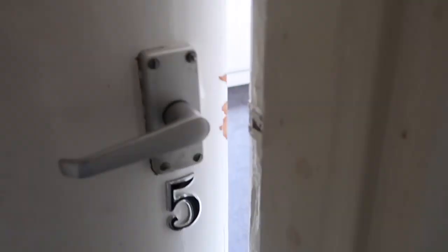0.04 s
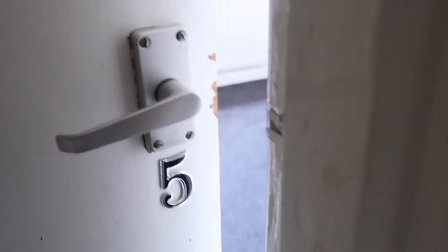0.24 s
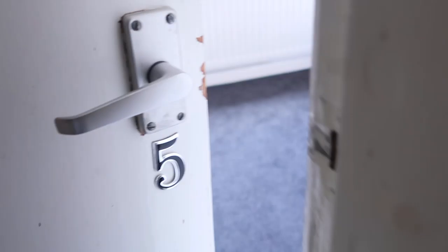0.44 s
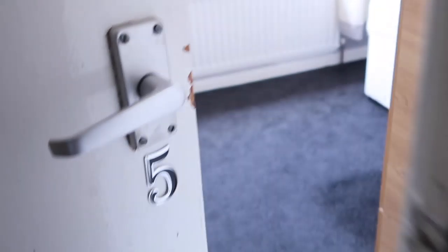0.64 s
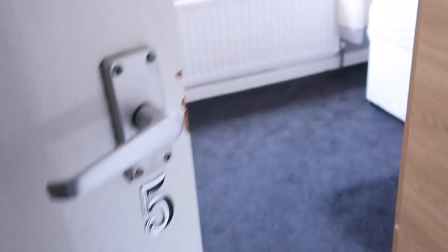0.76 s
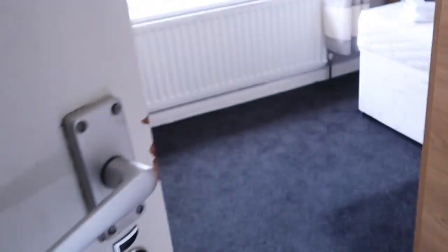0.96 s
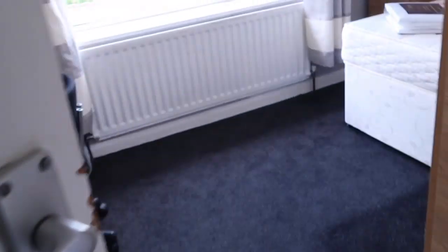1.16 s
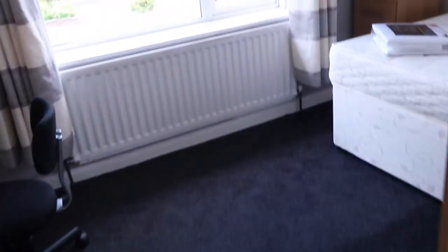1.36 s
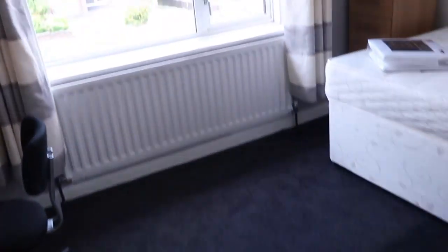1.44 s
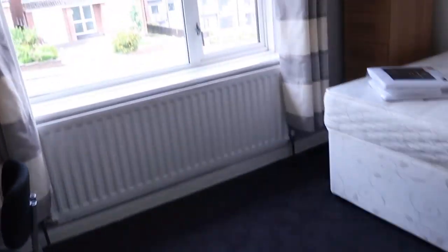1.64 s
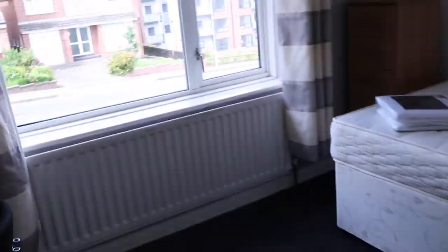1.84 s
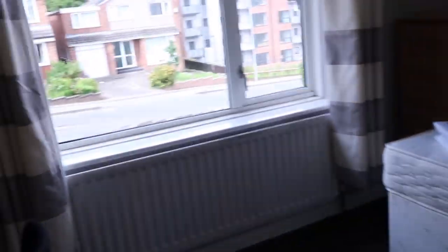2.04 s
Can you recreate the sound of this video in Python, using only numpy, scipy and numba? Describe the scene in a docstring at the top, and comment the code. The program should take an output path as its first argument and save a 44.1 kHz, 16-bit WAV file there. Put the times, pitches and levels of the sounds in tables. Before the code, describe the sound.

A door hinge squeals in a small, fairly dry carpeted room, heard close. Quiet room tone and soft low puffs of air on the microphones come first, strongest around 0.5 s. At 0.74 s a nasal squeal starts, steps up near 0.9 s, wavers, then slides down raspily until 1.28 s. A sharp wooden crack hits at 1.45 s, a small tick at 1.66 s, and a rough creaking groan runs from 1.83 to 2.1 s.

```python
"""Squealing door hinge

A door swings open near a hand-held camera in a carpeted room. Its hinge sticks and slips: summed harmonics
squeal, jump up a step and slide down into a rasp of fluttering harmonics and random clicks through resonators.
A lone crack and a later rough groan are random clicks ringing resonances; short noise bursts in single bands
give the squeal's onset, a faint high whistle and small ticks. Soft puffs of air on the microphones are low
swelling sines; filtered noise lies under everything as a quiet room tone."""
import sys
import numpy as np
from scipy import signal
from scipy.fft import rfft, irfft
from scipy.io import wavfile
from scipy.ndimage import uniform_filter1d
from numba import njit

SR = 44100
rng = np.random.default_rng(int(sys.argv[2]) if len(sys.argv) > 2 else 0)


def how_loud(loudness_db):
    """Turn decibels into a plain amplitude multiplier (0 dB gives 1, 20 dB gives 10)."""
    steps = np.asarray(loudness_db, float) / 20
    return 10 ** steps


def store_wav(level_fs):
    """Save 16-bit WAV to argv[1]."""
    pcm = np.round(np.clip(np.atleast_2d(level_fs), -1, 1) * 32767)
    wavfile.write(sys.argv[1], SR, pcm.T.astype(np.int16))


N = 92962
t = np.arange(N) / SR


def unit(x):
    """Normalisation: scale a signal to rms 1."""
    return x / np.sqrt(np.mean(x ** 2))


def along(rows, column=1):
    """Linear interpolation: one column of a time table at every sample, its ends held."""
    rows = np.array(rows, float)
    return np.interp(t, rows[:, 0], rows[:, column])


def tint_db(table, hz):
    """Spectral envelope: level of a (hz, level_db) table, interpolated on a log frequency axis."""
    table = np.array(table, float)
    return np.interp(np.log(np.maximum(hz, 1)), np.log(table[:, 0]), table[:, 1])


def colour(x, table):
    """Linear filtering: multiply the spectrum by a (hz, level_db) envelope."""
    hz = np.arange(N // 2 + 1) * SR / N
    return irfft(rfft(x) * how_loud(tint_db(table, hz)), N)


def late(x, lag_s):
    """Propagation delay: a phase shift proportional to frequency."""
    hz = np.arange(N // 2 + 1) * SR / N
    return irfft(rfft(x) * np.exp(-2j * np.pi * hz * lag_s), N)


def ring(x, hz, width_hz):
    """Simple resonance: one damped mode driven by x."""
    return signal.lfilter(*signal.iirpeak(hz, hz / width_hz, SR), x)


def walk(rate_hz):
    """Slow random modulation: white noise averaged twice over 1 / rate_hz, rms 1."""
    length = int(SR / rate_hz)
    return unit(uniform_filter1d(uniform_filter1d(rng.standard_normal(N), length), length))


def slips(rate_hz, spread_db):
    """Random impulse train: clicks of chance timing, size and sign, rate_hz on average, rms 1."""
    chance = rng.random((2, N))
    size = how_loud(spread_db * rng.standard_normal(N))
    return unit((chance[0] < rate_hz / SR) * size * np.sign(chance[1] - 0.5))


def gate(rows, fade_s=0.0011):
    """Time window: 1 inside a table's time span, with short linear fades."""
    return np.clip(np.minimum(t - rows[0][0], rows[-1][0] - t) / fade_s, 0, 1)


def burst(start_s, level_db, t60_s):
    """Exponential decay: a sudden start, then a fall of 60 dB in t60_s."""
    age = np.maximum(t - start_s, 0)
    return how_loud(level_db - 60 * age / t60_s) * np.clip(age / 0.0015, 0, 1)


def body(x, peaks, patchy_db=0, patchy_hz=50):
    """Modal superposition: parallel resonances, each swaying on its own by patchy_db; rms 1."""
    total = 0
    for k, (hz, width_hz, level_db) in enumerate(peaks):
        mode = unit(ring(ring(x, hz, width_hz), hz, width_hz))  # twice, for steep flanks
        gain = how_loud(level_db + patchy_db * walk(patchy_hz)) * np.sqrt(width_hz)
        total = total + (-1) ** k * gain * mode
    return unit(total)


# spectral density of the room tone's sum (mid) and difference (side) of channels, relative:
# hz [Hz], level_db [dB per Hz]
TONE_MID = [(15, -59.5), (30, -23.5), (110, 0.5), (250, 3), (500, -4.5), (1000, -8), (2000, -13.5),
            (4000, -19), (6000, -25), (11000, -38), (14000, -44.5)]
TONE_SIDE = [(15, -77), (30, -28.5), (340, 0.5), (570, -9), (1300, -13), (2100, -18), (4000, -20.5),
             (6000, -27.5), (9000, -35.5), (14000, -46.5)]
# course of the mid rms, before the flicker: start_s [s], level_db [dB]
TONE_LEVEL = [(0, -62.5), (.15, -64.5), (.3, -67.5), (.38, -72), (.7, -68.5), (1.35, -61.5), (1.6, -68),
              (2.11, -59.5)]


def room_tone():
    """Diffuse noise: coloured, partly decorrelated between the channels, flickering a little in level."""
    side_db = -2.5  # relative to mid
    mid = unit(colour(rng.standard_normal(N), TONE_MID)) * how_loud(2 * walk(44))
    side = unit(colour(rng.standard_normal(N), TONE_SIDE)) * how_loud(2 * walk(44))
    return how_loud(along(TONE_LEVEL)) * (mid + how_loud(side_db) * side * np.array([[1], [-1]]))


# soft puffs of air on the microphones, before sway and band filter:
# start_s [s], length_s [s], level_db [dB, nominal peak], pitch_hz [Hz], pan_db [dB, left minus right]
PUFFS = [(0.396, 0.014, -35.5, 131.5, -5), (0.41, .011, -34.5, 134, -1.5), (0.426, 0.022, -57, 110, -5),
         (0.465, 0.024, -53.5, 102, -2), (0.482, 0.012, -40, 95, 8), (0.497, 0.014, -38, 120, -9.5),
         (0.517, 0.016, -25, 121, 7), (0.532, 0.019, -28, 178, 4), (0.528, 0.0099, -35, 322, 2.5),
         (0.547, 0.02, -44.5, 137, 8), (0.576, 0.055, -45.5, 82.6, -2), (0.666, 0.033, -46, 107.5, 6.5),
         (0.698, 0.03, -52.5, 112.6, -3.5), (0.968, 0.019, -47, 133.8, -7), (1.801, 0.014, -45.5, 189, 4),
         (1.817, 0.015, -45, 146, 0)]


def puffs():
    """Amplitude and frequency modulation: short uneven low wobbles, panned singly, earlier on the right."""
    pitch_sway, harmonic_db, left_lag_s = 0.05, -13.5, 0.00086
    out, sway, shake = 0, walk(160), how_loud(1.1 * walk(110))
    for start_s, length_s, level_db, pitch_hz, pan_db in PUFFS:
        phase = 2 * np.pi * np.cumsum(pitch_hz * (1 + pitch_sway * sway) * (t > start_s)) / SR
        swell = np.sin(np.pi * np.clip((t - start_s) / length_s, 0, 1)) ** 0.78
        harmonic = how_loud(harmonic_db) * swell ** 2 * np.cos(2 * phase)
        wobble = -swell * shake * (np.sin(phase) + harmonic)
        out = out + how_loud(level_db + np.array([[pan_db], [-pan_db]]) / 2) * wobble
    out = signal.sosfilt(signal.butter(2, [38, 400], "band", fs=SR, output="sos"), out)
    return np.array([late(out[0], left_lag_s), out[1]])


# the groan's rms in the door's low, middle and high resonances:
# start_s [s], low_db [dB], middle_db [dB], high_db [dB]
GROAN = [(1.828, -51, -69, -91), (1.844, -44.5, -44.5, -99), (1.854, -44, -44.5, -63),
         (1.896, -37.5, -45.5, -55.5), (1.92, -47.5, -46, -67), (1.978, -40.5, -46.5, -66),
         (1.992, -42, -45, -64), (2.028, -51.5, -46, -66.5), (2.1, -47.5, -56.5, -97),
         (2.108, -50, -55.5, -89)]
# the door's resonances, a low, a middle and a high group, each ringing twice in series:
# pitch_hz [Hz], width_hz [Hz, of one pass], level_db [dB, relative density]
DOOR = [
    [(342.6, 107, 3), (500, 120, -11), (784, 198, -2.5), (979, 49, -9.5)],
    [(1336, 640, -10.5), (1850, 410, -8.5), (2114, 93, 0), (2296, 177, 1)],
    [(3000, 350, -4), (3480, 110, 2.5), (3880, 200, 2.5), (4426, 240, 5.5), (4750, 140, -7)],
]


def groan():
    """Forced vibration: dense irregular slips ring the door's resonances."""
    grit = slips(1900, 1)
    out = 0
    for k, peaks in enumerate(DOOR):
        out = out + body(grit, peaks, 2.3, 30) * how_loud(along(GROAN, k + 1))
    return out * (t > GROAN[0][0])


# short noise bursts: the squeal's onset, a faint high whistle, small ticks (one of several bands);
# each band rings twice in series:
# start_s [s], level_db [dB, rms at onset before halving], pitch_hz [Hz], width_hz [Hz, of one pass], t60_s [s]
NOISE_BURSTS = [(0.739, -42, 1350, 587, 0.097), (0.794, -65, 10550, 2000, 0.27),
                (1.031, -40.5, 11200, 2206, .016), (1.638, -52, 350, 245, 0.087),
                (1.6561, -29, 2240, 486, 0.01), (1.6567, -38, 4330, 890, 0.014),
                (1.659, -40.5, 1700, 296, 0.022), (1.697, -52, 350, 250, 0.11)]


def noise_bursts():
    """Band-limited noise: each burst is noise through one resonance, starting suddenly and decaying."""
    out = 0
    for start_s, level_db, pitch_hz, width_hz, t60_s in NOISE_BURSTS:
        band = body(rng.standard_normal(N), [(pitch_hz, width_hz, 0)])
        out = out + burst(start_s, level_db, t60_s) * band / 2
    return out


# the loud crack: start_s [s], level_db [dB, before the wood and the first blow], t60_s [s]
CRACK = (1.448, -31, 0.16)
# the wood's resonances under crack and scrape, each ringing twice in series:
# pitch_hz [Hz], width_hz [Hz, of one pass], level_db [dB, relative density]
WOOD = [(350, 176, -4), (987, 670, -2.5), (1487, 200, 0.5), (1860, 620, -1.5), (2286, 150, -4.5),
        (2660, 220, 4.5), (3115, 350, -16), (3574, 140, -3), (5260, 1800, -27.5), (8260, 1100, -31),
        (11420, 1200, -24), (13200, 1600, -34)]


def crack():
    """Impulsive excitation: a decaying rattle of clicks rings the wood's modes."""
    first_blow = 1 + 1.5 * burst(CRACK[0], 0, 0.03)  # stands out of the rattle
    return first_blow * burst(*CRACK) * body(slips(3100, 2), WOOD) / 2


# the two rasps while the pin slides, before the offsets in scrape() and squeal():
# start_s [s], level_db [dB]
RASP = [
    [(0.86, -59), (0.88, -37), (0.895, -44), (0.925, -45), (0.96, -56.5)],
    [(1.12, -59), (1.134, -49), (1.141, -44), (1.18, -36), (1.21, -38.5), (1.228, -39.5), (1.25, -53),
     (1.3, -84)],
]


def scrape():
    """Sliding friction: uneven slips ring the wood while the pin slides."""
    offset_db = -9
    grit = body(slips(900, 2.4), WOOD[:9], 3, 90)
    return sum(gate(rows, 0.0076) * how_loud(along(rows) + offset_db) for rows in RASP) * grit


def slip_phase(rows):
    """Frequency integration: phase of the stick-slip cycle, its rate shaking by 0.5 % rms."""
    return 2 * np.pi * np.cumsum(along(rows) * (1 + 0.005 * walk(150))) / SR


def overtones(rows, phase, table, sway, numbers):
    """Fourier synthesis: multiples of the slip rate under an envelope, each swaying on its own."""
    gains = [how_loud(tint_db(table, k * along(rows))) for k in numbers]
    total = 0
    for k, gain in zip(numbers, gains):
        total = total + gain * sway() * np.sin(k * phase + 2 * np.pi * rng.random())
    return total / np.sqrt(sum(gain ** 2 for gain in gains))  # rms about 0.7


# squeal at the low, then the high grip of the hinge pin: start_s [s], pitch_hz [Hz, slip rate],
# level_db [dB, fundamental], low_db [dB, low overtones], high_db [dB, high overtones]
SQUEAL_LOW = [(0.736, 723, -61.5, -64.5, -84.5), (0.741, 643.3, -34, -49, -71),
              (0.747, 576.4, -42.5, -42.5, -57), (0.758, 580, -30.5, -43.5, -54.5),
              (0.78, 571, -36, -41, -60), (0.797, 571, -36, -42.5, -70.5), (0.83, 560.3, -33, -48, -62),
              (0.845, 566.2, -28, -44, -48), (0.865, 581.3, -32, -41.5, -37.5),
              (0.877, 606.2, -33, -29, -48.5), (0.887, 600.5, -59, -29, -47),
              (0.893, 602.6, -37.5, -57, -63.5), (0.923, 601, -43, -59.5, -70),
              (0.94, 595, -53, -62.5, -71.5)]
SQUEAL_HIGH = [(0.882, 760, -45.5, -55, -58.5), (0.892, 785.6, -29.5, -48, -45.5),
               (0.922, 784, -39, -57.5, -40), (0.944, 784.8, -53, -43.5, -37.5),
               (0.954, 785.3, -31, -47.5, -48.5), (0.968, 750, -27.5, -39.5, -50.5),
               (0.982, 758.2, -34.5, -51.5, -52), (0.99, 753.8, -33, -38, -51.5),
               (1.014, 771.3, -35, -57, -64), (1.046, 794.3, -44, -68, -58), (1.068, 812, -31, -44, -55),
               (1.086, 824.3, -37.5, -46, -43.5), (1.1, 819.5, -34, -48, -52),
               (1.118, 786.4, -35, -47, -57.5), (1.135, 774, -44, -55, -54),
               (1.142, 730.6, -31.5, -37.5, -51), (1.149, 719, -46.5, -38, -45),
               (1.154, 687, -32, -59, -63), (1.161, 603, -40, -63, -54), (1.166, 576.4, -34, -44.5, -43.5),
               (1.188, 531.6, -40.5, -57.5, -37), (1.212, 473, -59.5, -58.5, -50),
               (1.22, 433.6, -42, -41.5, -64), (1.229, 405, -35.5, -52, -68),
               (1.235, 390.4, -46, -48, -84.5), (1.242, 350.7, -34.5, -43.5, -65.5),
               (1.251, 344.4, -43.5, -54.5, -69), (1.256, 347, -36, -59, -73),
               (1.262, 324, -41, -57.5, -74), (1.273, 309, -51.5, -59, -76), (1.281, 310, -69, -69, -92)]
# relative colour of the clean overtones and of the rasp: hz [Hz], level_db [dB]
HINGE_COLOUR = [(700, 8.5), (1200, 12), (1750, 14.5), (2400, 0.5), (3200, -2), (4200, 0.5), (5200, -18),
                (6500, -36.5), (13000, -53)]
RASP_COLOUR = [(250, 13), (400, 4.5), (1100, 2), (1550, 1.5), (2150, -5), (2650, -3.5), (3100, -6),
               (3550, -4.5), (4300, -8), (6000, -22), (7800, -40.5), (14000, -49)]


def squeal(rows, rasp):
    """Stick-slip oscillation: fundamental, clean overtones, and fluttering ones while the pin slides."""
    split_hz, rasp_offset_db, rasp_jitter = 2000, -4, 0.028
    phase = slip_phase(rows)
    over = overtones(rows, phase, HINGE_COLOUR, lambda: how_loud(5 * walk(70)), range(2, 18))
    low = signal.sosfiltfilt(signal.butter(2, split_hz, "low", fs=SR, output="sos"), over)
    high = signal.sosfiltfilt(signal.butter(2, split_hz, "high", fs=SR, output="sos"), over)
    clean = how_loud(along(rows, 2)) * np.sin(phase)
    clean = clean + how_loud(along(rows, 3)) * low + how_loud(along(rows, 4)) * high
    shaken = phase + 2 * np.pi * np.cumsum(along(rows) * rasp_jitter * walk(120)) / SR
    rough = overtones(rows, shaken, RASP_COLOUR, lambda: walk(220), range(1, 24))
    rough = signal.sosfilt(signal.butter(2, 260, "high", fs=SR, output="sos"), rough)
    rough = gate(rasp, 0.012) * how_loud(along(rasp) + rasp_offset_db) * rough
    return np.sqrt(2) * (gate(rows) * clean + rough)


@njit
def walls(x, lags, gain, damp):
    """Feedback delay network: eight delay lines feed each other, duller on every round."""
    line, soft, out = np.zeros((8, 4096)), np.zeros(8), np.zeros((2, len(x)))
    for i in range(len(x)):
        total = 0.
        for k in range(8):
            soft[k] += (1 - damp) * (gain[k] * line[k, (i - lags[k]) & 4095] - soft[k])
            total += soft[k]
            out[k % 2, i] += soft[k]
        for k in range(8):
            line[k, i & 4095] = x[i] + soft[k] - total / 4  # lossless mixing of the lines
    return out


def reverberate(door):
    """Reverberation: the door off the walls, its channels differing mainly in the treble."""
    t60_s, damp = 0.23, 0.63  # t60 of the lowest tones; higher ones die sooner
    lags = np.array([331, 457, 601, 743, 887, 1049, 1213, 1399])  # samples
    echo = walls(door + 1e-18, lags, how_loud(-60 * lags / SR / t60_s), damp)
    # close microphones hear the bass alike
    side = signal.lfilter(*signal.butter(1, 2500, "high", fs=SR), echo[0] - echo[1]) * how_loud(-1)
    return (echo[0] + echo[1] + side * np.array([[1], [-1]])) / 2


def scene():
    """Superposition: door direct and off the walls, puffs, room tone; direct sound is later on the right."""
    pan_db, right_lag_s, echo_db = 1.5, 0.000036, -12.5  # left up and right down by pan_db / 2
    door = squeal(SQUEAL_LOW, RASP[0]) + squeal(SQUEAL_HIGH, RASP[1])
    door = door + scrape() + groan() + crack() + noise_bursts()
    direct = np.array([door, late(door, right_lag_s)]) * how_loud(np.array([[pan_db], [-pan_db]]))
    direct = direct / how_loud(np.array([[pan_db], [-pan_db]]) / 2)
    return direct + how_loud(echo_db) * reverberate(door) + puffs() + room_tone()


def roll_off(x):
    """The treble ends steeply here."""
    return signal.sosfilt(signal.butter(12, 14200, fs=SR, output="sos"), x)


def record(dry):
    """Signal chain: the finished mix passes to the camera's output."""
    return roll_off(dry)


dry = scene()
out = record(dry)
store_wav(out)
```